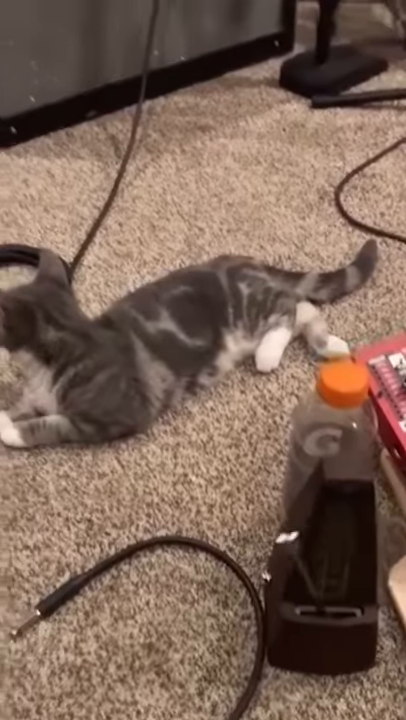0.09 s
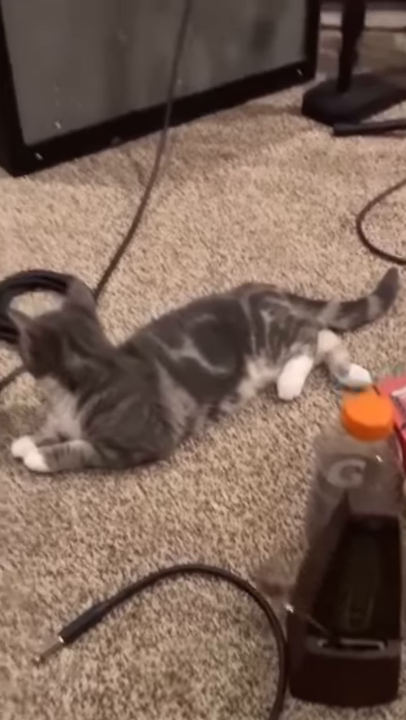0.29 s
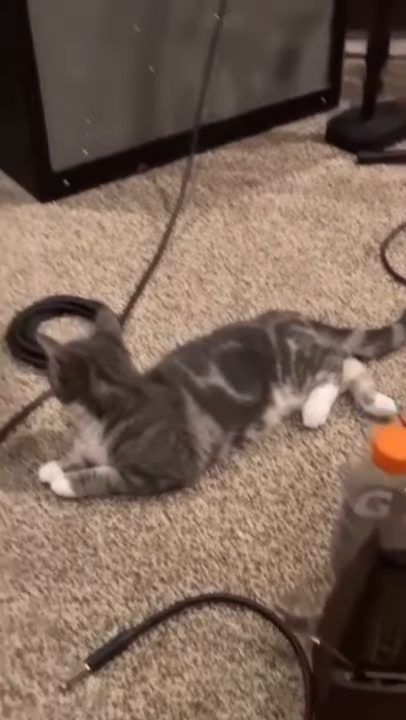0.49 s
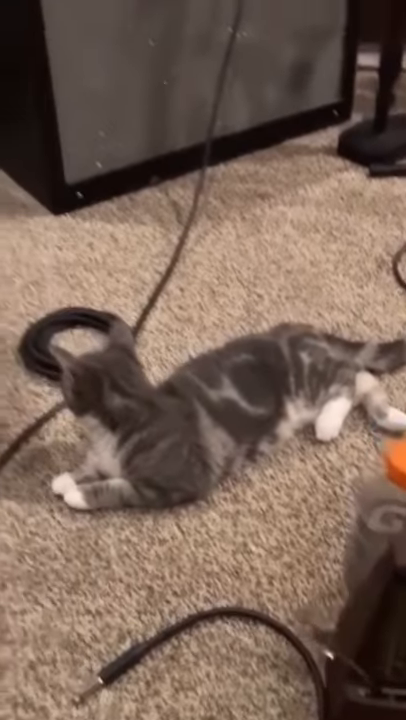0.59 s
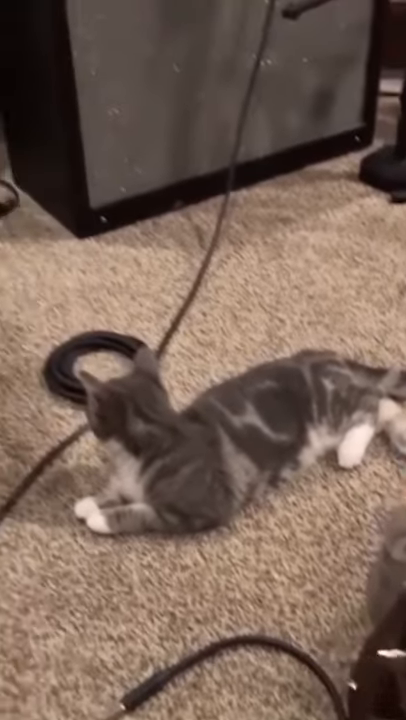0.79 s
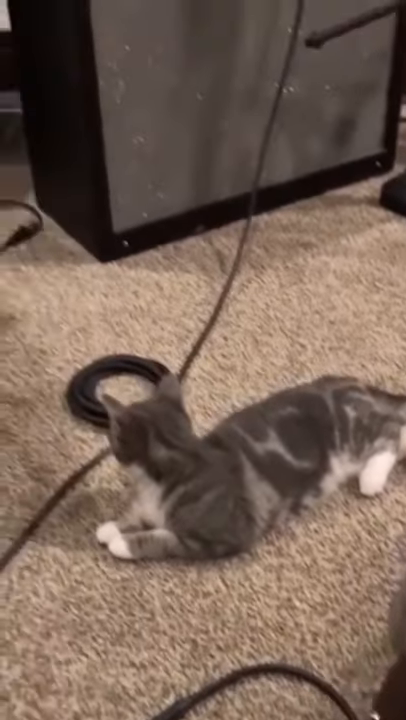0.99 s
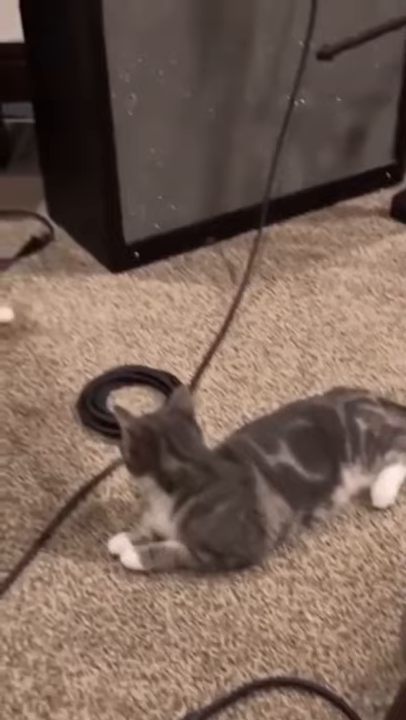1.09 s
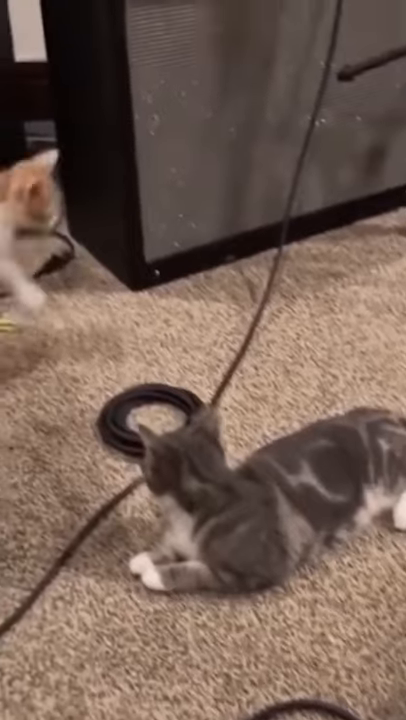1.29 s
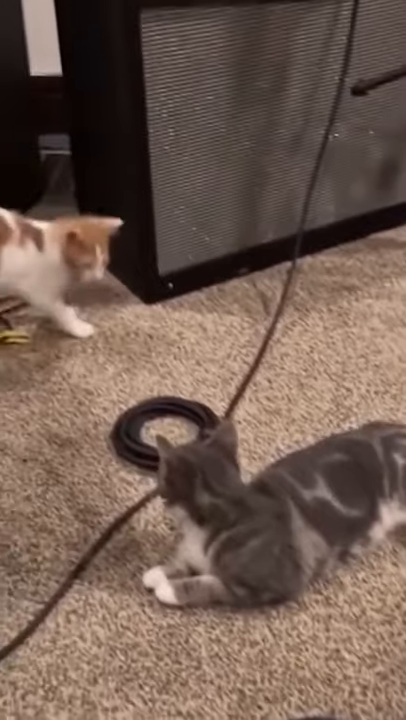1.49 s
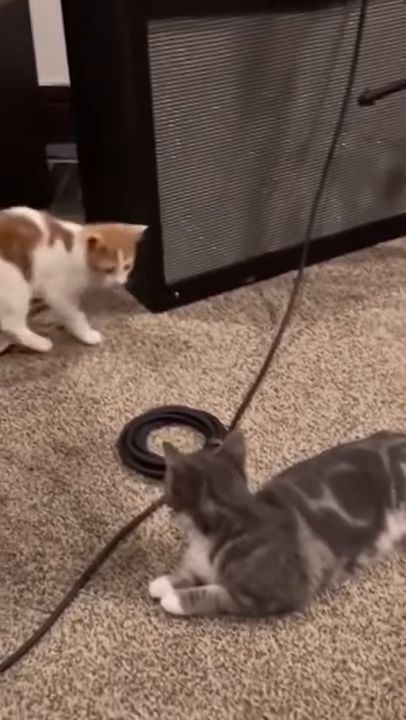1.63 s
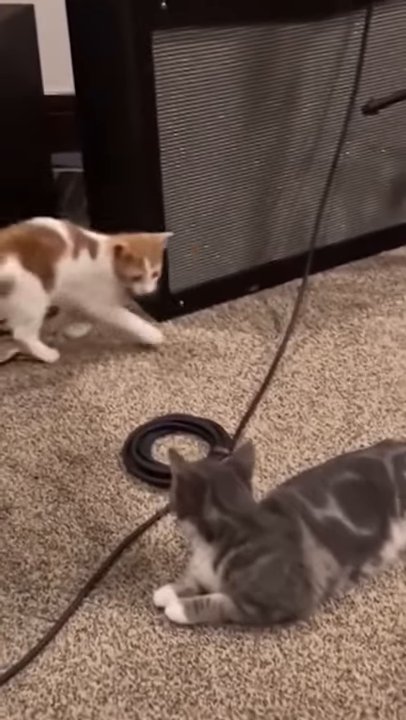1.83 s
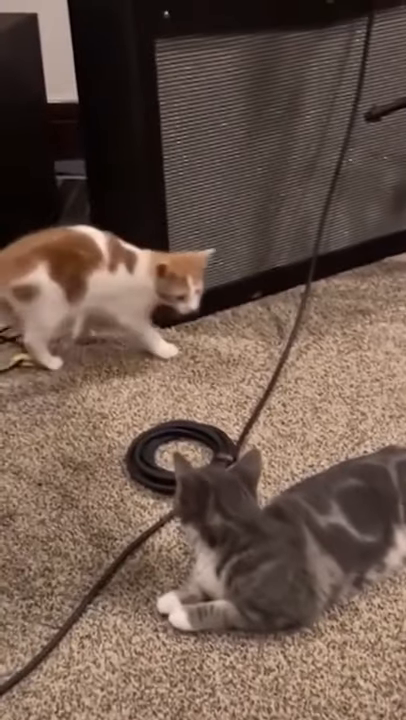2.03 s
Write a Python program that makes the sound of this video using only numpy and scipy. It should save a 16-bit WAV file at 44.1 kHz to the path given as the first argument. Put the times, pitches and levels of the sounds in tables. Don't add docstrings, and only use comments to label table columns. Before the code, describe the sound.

A mechanical metronome on carpet gives a crisp woody tick, then about one second later a slightly drier tock, over faint low ventilation hum and slight hiss in a small damped room, picked up by a phone microphone.

```python
import sys
import numpy as np
from scipy import signal
from scipy.fft import rfft, irfft
from scipy.io import wavfile

SR = 44100
rng = np.random.default_rng(int(sys.argv[2]) if len(sys.argv) > 2 else 0)


def inscribe(sig):
    pcm = np.round(np.clip(np.atleast_2d(sig).T, -1, 1) * 32767)
    wavfile.write(sys.argv[1], SR, pcm.astype(np.int16))


def ratio_of_db(decibels):
    return 10 ** (np.asarray(decibels, float) / 20)


N = 92610

# (frequency [Hz], density [dB per Hz])
HUM_SPECTRUM = [(20, -10), (47, -8), (152, -0.5), (193, -11), (262, -4), (302, -16.5), (363, -15),
                (420, -40)]
HISS_SPECTRUM = [(380, 0), (800, -2), (1500, -4), (2200, -10.5), (2700, -12.5), (4600, -18), (5800, -27.5),
                 (15900, -33)]
SIDE_SPECTRUM = [(30, -3), (300, -10.5), (500, -3.5), (900, 1), (2000, -5.5), (4600, -16), (6000, -24),
                 (15900, -25)]
# (frequency [Hz], width [Hz], level [dB], side re mid [dB])
DUCT_MODES = [(164.8, 36, -64, -58.5), (226.4, 2.7, -68, -40), (259.1, 6.3, -66.5, -46.5),
              (374.8, 9.9, -77, -31), (721, 33, -77, -12.5), (927, 3.4, -83.5, 3)]
HUM_DB, HISS_DB, SIDE_DB = -57, -76, -82.5
FLUTTER_DB = -0.5

# (frequency [Hz], T60 [s])
ROOM_T60 = [(400, 0.21), (1000, 0.14), (2500, 0.16), (5000, 0.14), (10000, 0.16), (13000, 0.11),
            (16000, .1)]
# (frequency [Hz], side re mid [dB])
ROOM_SIDE = [(400, -23), (1300, -1.5), (2200, -3.5), (4000, -1.5), (12000, -0.5)]
# (case knock [dB], metal crack [dB])
TICK_ROOM_DB = [-10, 1.5]
TOCK_ROOM_DB = [-5.5, 0]
BUILD_UP_S = 0.0091
LATE_DB, LATE_STRETCH, LATE_TOP_HZ = -10, 2.5, 6500

TICK_RING_HZ = [749, 1224, 1278, 2072, 2146, 2146, 2532, 2588, 4060, 4920]
TOCK_RING_HZ = [746, 891, 1230, 1320, 1631, 1773, 2105, 2157, 3292, 3378]
TICK_RING_S = [.238, .225, .225, .225, .225, .225, .225, .225, .227, .227]
TOCK_RING_S = [1.25, 1.245, 1.245, 1.25, 1.25, 1.252, 1.245, 1.26, 1.255, 1.255]
# (level [dB], T60 [s])
TICK_RINGS = [(-38.5, 0.12), (-61.5, 0.33), (-40.5, .14), (-51, 0.13), (-46, .11), (-61, 0.42),
              (-57.5, 0.22), (-49, 0.22), (-57.5, 0.17), (-57, .12)]
TOCK_RINGS = [(-58.5, .2), (-56, 0.13), (-47.5, .14), (-59.5, 0.29), (-54.5, .2), (-43, .13), (-47.5, .12),
              (-62.5, 0.33), (-56.5, .12), (-55, 0.11)]
RING_SWELL_S = 0.00067

# (time [s], knock level [dB], crack level [dB], dullness [dB per octave below 1600 Hz])
TICK_CONTACTS = [
    (.2231, -28, -57, -0.5),
    (.2250, -27, -50.5, 0.5),
    (.2277, -30.5, -33.5, 1.5),
    (.2297, -33, -39, 1),
    (.2398, -36, -45, 7.5),
    (.2422, -34, -47, 7),
    (.2480, -41.5, -46, 4.5),
    (.2535, -40, -52.5, -2.5),
]
TOCK_CONTACTS = [
    (1.2412, -44, -45, -4),
    (1.2433, -28, -39, 4.5),
    (1.2448, -37, -32.5, 0.5),
    (1.2462, -35.5, -40, 4),
    (1.2485, -33, -44, 2),
    (1.2522, -39.5, -39.5, 1.5),
    (1.2591, -43, -49, -0.5),
    (1.2640, -40.5, -48.5, 2.5),
    (1.2680, -37.5, -48, 4),
]
# (frequency [Hz], level [dB], T60 [s])
TICK_MODES = [(739, -19, 0.031), (1280, -4, 0.018), (1700, -12, .012), (2136, -4.5, .014),
              (2470, -7.5, .012), (3980, -16.5, .01), (6437, -13.5, .01)]
TOCK_MODES = [(850, -23.5, 0.011), (1260, -7, .009), (1708, -4.5, 0.009), (2127, -2.5, 0.0074),
              (3360, -14, 0.019), (6100, -7.5, .006), (10800, -8, .005)]
# (frequency [Hz], density [dB per Hz])
TICK_CRACK = [(300, -14), (900, -9), (2000, -8), (3200, -10.5), (6300, -12), (8000, -13.5), (11000, -14),
              (15800, -22.5)]
TOCK_CRACK = [(300, -14.5), (900, -4.5), (2000, -3), (3400, -10), (6000, -10), (8000, -14), (11000, -13),
              (15800, -38)]
CRACK_SWELL_S, CRACK_T60_S = 0.00045, 0.014
SCRAPE_RISE_S, SCRAPE_DB, SCRAPE_TOP_HZ = 0.0076, -53.5, 6900

MIC_LOW_HZ, MIC_TOP_HZ = 40, 15750


def rms_one(x):
    return x / np.sqrt(np.mean(x ** 2) + 1e-20)


def at_hz(points, hz):
    table_hz, values = np.array(points).T
    return np.interp(np.log(np.maximum(hz, 1)), np.log(table_hz), values)


def coloured_noise(spectrum):
    hz = np.fft.rfftfreq(N, 1 / SR)
    inside = (hz > spectrum[0][0]) & (hz < spectrum[-1][0])
    gain = ratio_of_db(at_hz(spectrum, hz)) * inside
    return rms_one(irfft(rfft(rng.standard_normal(N)) * gain, N))


def drift(rate_hz):
    points = rng.standard_normal(100)
    return np.interp(np.arange(N) / SR * rate_hz, np.arange(100), points)


def resonator(drive, hz, t60_s):
    r, w = ratio_of_db(-60 / (t60_s * SR)), 2 * np.pi * hz / SR
    return signal.lfilter([0, np.sin(w)], [1, -2 * r * np.cos(w), r * r], drive + 1e-18)


def ventilation():
    rumble = ratio_of_db(HUM_DB + FLUTTER_DB * drift(12)) * coloured_noise(HUM_SPECTRUM)
    hiss = ratio_of_db(HISS_DB + FLUTTER_DB * drift(5.9)) * coloured_noise(HISS_SPECTRUM)
    out = np.array([rumble + hiss, ratio_of_db(SIDE_DB) * coloured_noise(SIDE_SPECTRUM)])
    for hz, width_hz, db, side_db in DUCT_MODES:
        noise = rng.standard_normal((2, N + SR))
        settled = resonator(noise, hz, 2.2 / width_hz)[:, SR:]
        out += ratio_of_db([[db], [db + side_db]]) * rms_one(settled)
    return out


def room(x):
    t = np.arange(SR) / SR
    white = rng.standard_normal((2, 2, SR))
    echo = np.zeros((2, SR))
    edges_hz = 250 * 2 ** np.arange(0, 6.1, .5)
    for k, (low_hz, high_hz) in enumerate(zip(edges_hz, edges_hz[1:])):
        hz = np.sqrt(low_hz * high_hz)
        t60_s = at_hz(ROOM_T60, hz)
        early_power = ratio_of_db(-120 * t / t60_s)
        late_power = (hz < LATE_TOP_HZ) * ratio_of_db(2 * LATE_DB - 120 * t / t60_s / LATE_STRETCH)
        sos = signal.butter(2, [low_hz, high_hz], "band", fs=SR, output="sos")
        band = signal.sosfilt(sos, white[k % 2])
        echo += band * np.sqrt(early_power + late_power) * ratio_of_db([[0], [at_hz(ROOM_SIDE, hz)]])
    echo *= (1 - np.exp(-(t / BUILD_UP_S) ** 2)) / np.sqrt(SR / 100)
    return signal.fftconvolve(x[None], echo, axes=1)[:, :N]


def panel_rings(pitches_hz, starts_s, rings):
    out = np.zeros(N)
    for hz, start_s, (db, t60_s) in zip(pitches_hz, starts_s, rings):
        t = np.maximum(np.arange(N) / SR - start_s, 0)
        envelope = ratio_of_db(db - 60 * t / t60_s) * (1 - np.exp(-t / RING_SWELL_S))
        out += envelope * np.sin(2 * np.pi * hz * t)
    return out


def case_knock(at, knock_db, dullness_db, modes):
    out = np.zeros(N)
    for hz, mode_db, t60_s in modes:
        clicks = np.zeros(N)
        clicks[at] = ratio_of_db(knock_db + mode_db + dullness_db * np.log2(1600 / hz))
        peak_gain = 2 * np.e * np.log(1000) / (t60_s * SR)
        out += resonator(resonator(clicks, hz, t60_s), hz, t60_s) * peak_gain
    return out


def crack_envelope(at, crack_db):
    bursts = np.zeros(N)
    bursts[at] = ratio_of_db(crack_db)
    rise = np.exp(-1 / (CRACK_SWELL_S * SR))
    decay = ratio_of_db(-60 / (CRACK_T60_S * SR))
    return signal.lfilter([1 - rise], np.polymul([1, -rise], [1, -decay]), bursts)


def tooth_scrape(metal, drop_s):
    t = np.arange(N) / SR - drop_s
    dull = signal.sosfilt(signal.butter(6, SCRAPE_TOP_HZ, fs=SR, output="sos"), metal)
    return ratio_of_db(SCRAPE_DB) * np.exp(np.minimum(t, 0) / SCRAPE_RISE_S) * (t < 0) * dull


def beat(contacts, modes, crack_spectrum, room_db):
    time_s, knock_db, crack_db, dullness_db = np.transpose(contacts)
    at = (time_s * SR).astype(int)
    knock = case_knock(at, knock_db, dullness_db, modes)
    metal = coloured_noise(crack_spectrum)
    crack = crack_envelope(at, crack_db) * metal
    scrape = tooth_scrape(metal, time_s[1])
    wash = room(ratio_of_db(room_db[0]) * knock + ratio_of_db(room_db[1]) * crack)
    return wash + (knock + crack + scrape) * [[1], [0]]


def scene():
    mid, side = (ventilation()
                 + beat(TICK_CONTACTS, TICK_MODES, TICK_CRACK, TICK_ROOM_DB)
                 + beat(TOCK_CONTACTS, TOCK_MODES, TOCK_CRACK, TOCK_ROOM_DB))
    mid = mid + panel_rings(TICK_RING_HZ, TICK_RING_S, TICK_RINGS)
    mid = mid + panel_rings(TOCK_RING_HZ, TOCK_RING_S, TOCK_RINGS)
    return np.array([mid + side, mid - side])


def top_cut(x):
    return signal.sosfilt(signal.butter(12, 16000, fs=SR, output="sos"), x)


def record(dry):
    cut = signal.sosfilt(signal.butter(4, MIC_LOW_HZ, "high", fs=SR, output="sos"), dry)
    cut = signal.sosfilt(signal.cheby2(12, 60, MIC_TOP_HZ + 250, fs=SR, output="sos"), cut)
    return top_cut(cut)


dry = scene()
out = record(dry)
inscribe(out)
```